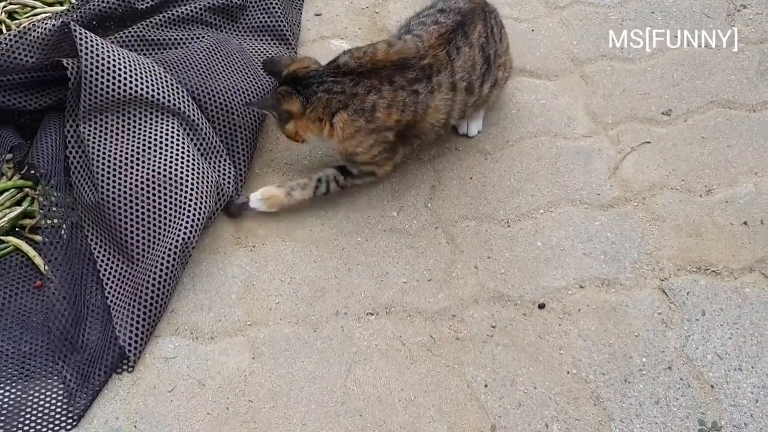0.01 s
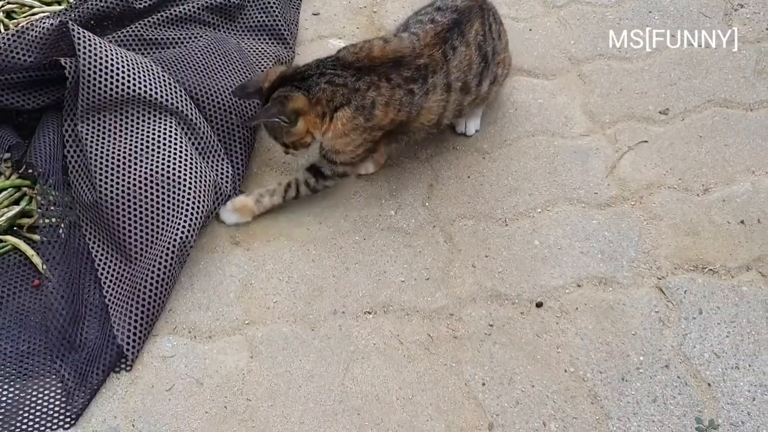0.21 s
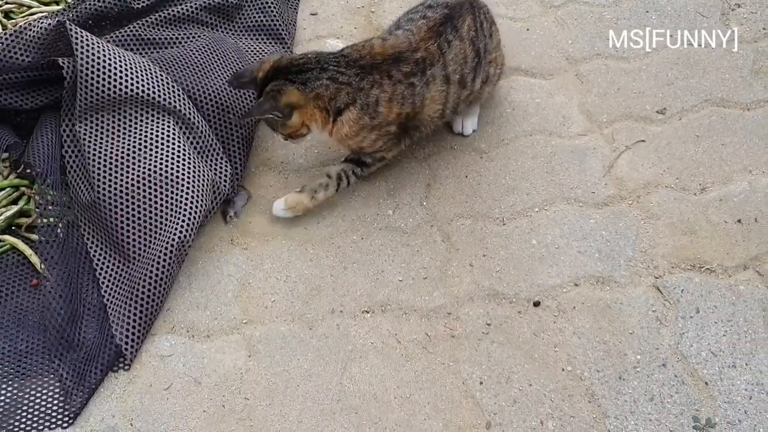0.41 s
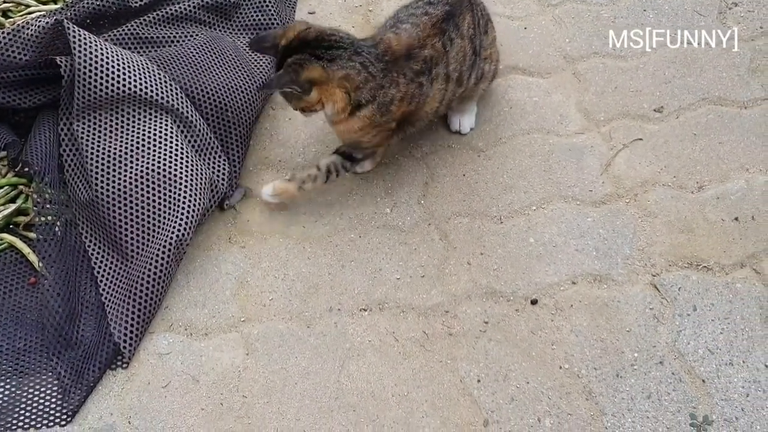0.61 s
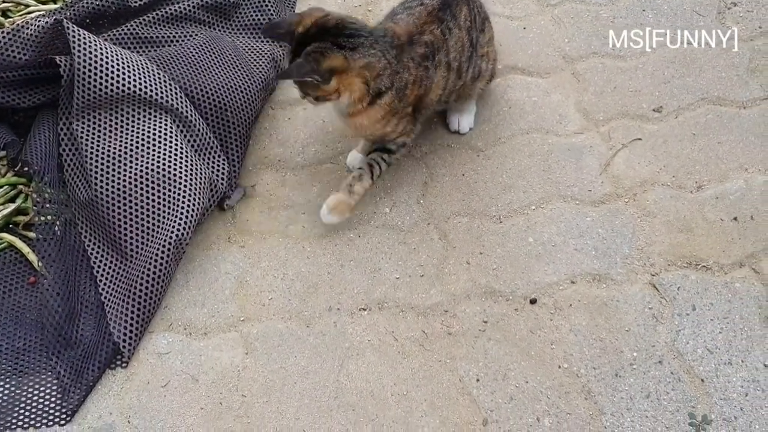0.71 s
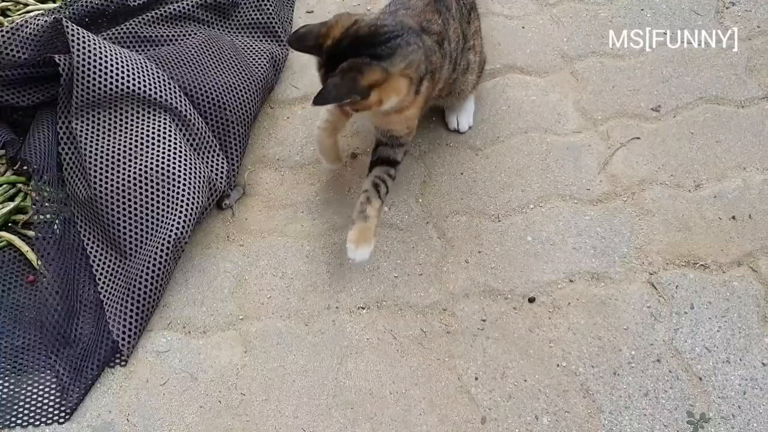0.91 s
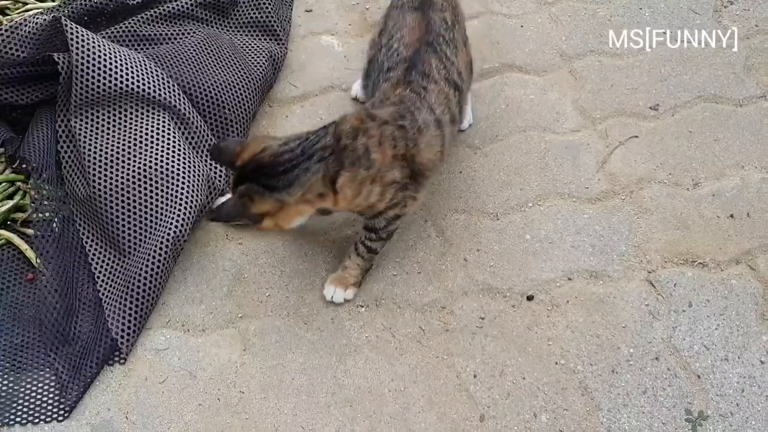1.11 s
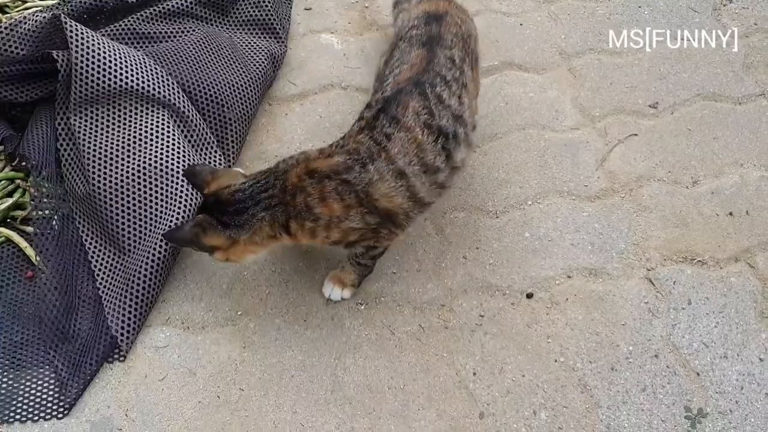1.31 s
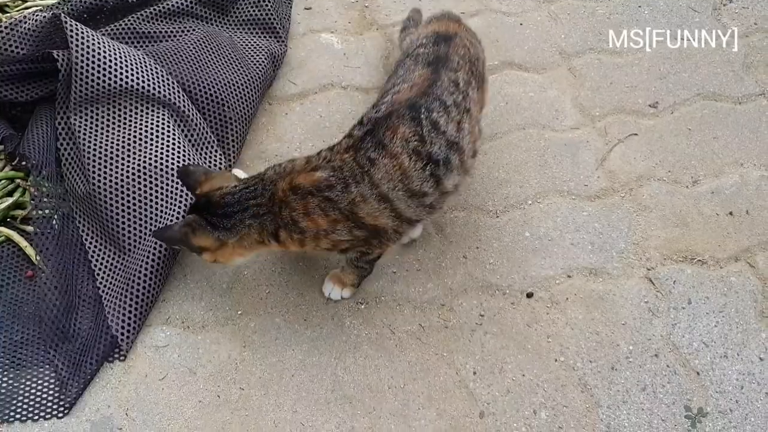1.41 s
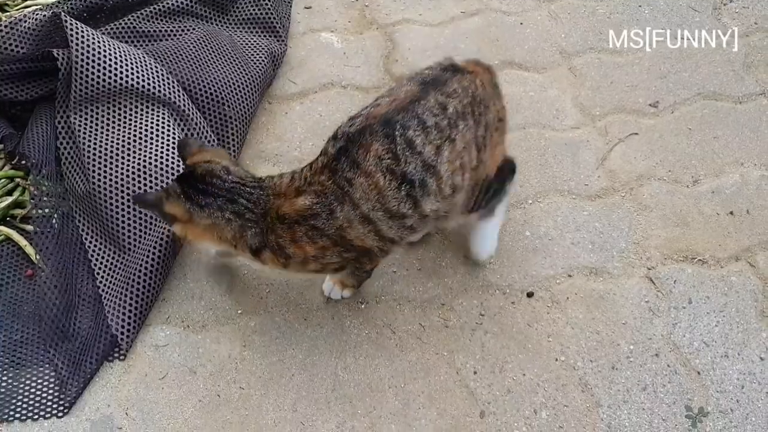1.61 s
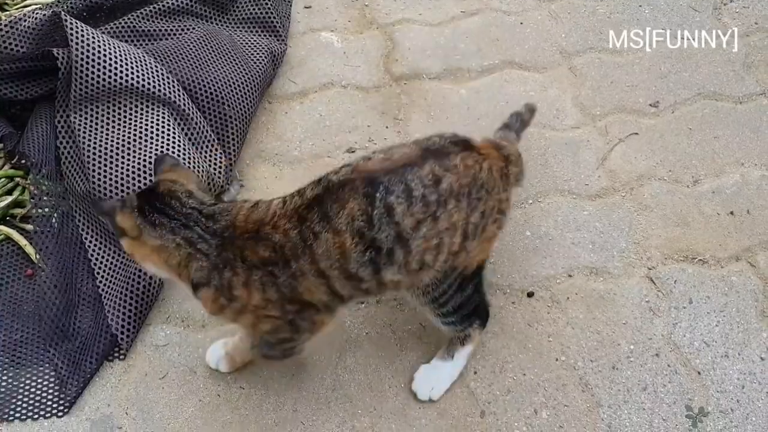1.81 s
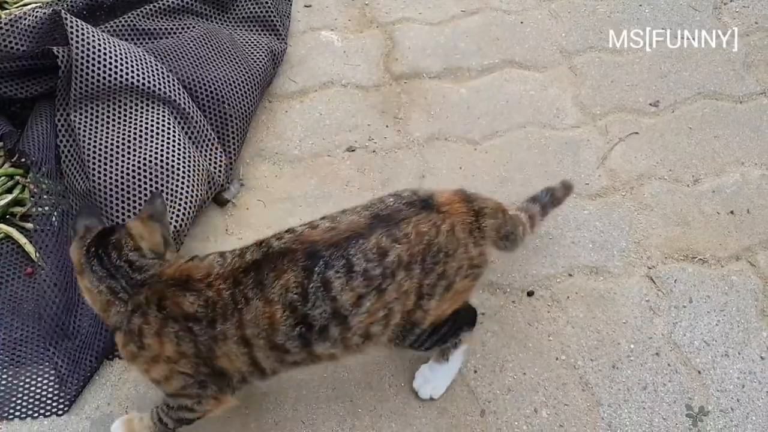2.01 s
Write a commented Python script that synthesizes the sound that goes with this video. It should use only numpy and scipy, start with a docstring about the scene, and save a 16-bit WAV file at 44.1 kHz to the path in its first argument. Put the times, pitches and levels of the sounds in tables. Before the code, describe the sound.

A mouse gives three shrill, trembling squeaks in an outdoor yard, the first overloading the close microphone. A cat's paws scuff netting and thud softly, with a faint low cat call before the last squeak. Far birds whistle and caw.

```python
"""First you hear a low outdoor rumble and a thin, far bird note. Then a mouse, hidden in netting on a paved
yard, gives three shrill, trembling squeaks as a cat paws at it. The first squeak is so loud that it overloads
the nearby microphone, which buzzes grittily. Paws scuff the net and pad on the ground, faint scratchy noises
sound under the later squeaks, and the cat gives one short low call. Far birds whistle and caw."""
import sys
import numpy as np
from scipy import signal
from scipy.fft import rfft, irfft, next_fast_len
from scipy.io import wavfile
from scipy.ndimage import map_coordinates

SR = 44100
rng = np.random.default_rng(int(sys.argv[2]) if len(sys.argv) > 2 else 0)


def store_wav(level_fs):
    """Save 16-bit WAV to argv[1]."""
    pcm = np.round(np.clip(np.atleast_2d(level_fs), -1, 1) * 32767)
    wavfile.write(sys.argv[1], SR, pcm.T.astype(np.int16))


N = 92610

# How alike the background and other broad noises are in both ears: frequency_hz, likeness (1 = same)
EAR_LIKENESS = [(60, 0.9), (150, 0.87), (350, 0.39), (700, .1), (3000, .05), (14000, 0.04)]
# Tone colour of the rumble: frequency_hz, gain_db
RUMBLE_COLOUR = [(13, -44.5), (22, -11.5), (36, -17), (60, 1), (78, -5), (108, -9.5), (167, -10.5),
                 (205, -5.5), (337, -22.5), (376, -25), (400, -26), (520, -31.5), (880, -120)]
# How the rumble rises and falls: time_s, level_db
RUMBLE_LEVEL = [(0.0, -46), (0.25, -42), (0.57, -42), (0.71, -49.5), (0.82, -45), (0.9, -46.5), (1.35, -46),
                (1.43, -40.5), (1.9, -43.5), (2.05, -41.5), (2.1, -46)]
# Tone colour of the steady outdoor hiss: frequency_hz, gain_db
AIR_COLOUR = [(180, -26), (300, 0), (395, -24), (436, -7.5), (556, -4), (698, -5.5), (965, -7.5),
              (1450, -10.5), (4360, -10.5), (14500, -13.5)]
# Thin notes of far birds: peak_s, spread_s, pitch_hz, width_hz, level_db, scoop_hz
BIRD_NOTES = [(0.046, 0.2, 3980, 600, -55, 0), (0.525, 0.1, 3860, 420, -51, 180),
              (.925, 0.07, 3520, 220, -55, 0), (1.895, 0.06, 4200, 450, -54.5, 0),
              (2.084, 0.048, 3950, 498, -58, 0)]
# Rasps in the mouse's voice: start_s, rise_s, level_db, fade_s (time to drop 60 dB)
RASPS = [(.178, 0.018, -29, 0.13), (.540, 0.017, -31.5, 0.3), (1.372, .012, -36, 0.42),
         (1.3995, 0.0015, -19, .05)]
# Tone colour of the rasps: frequency_hz, gain_db
RASP_COLOUR = [(7000, -28), (9500, -14), (11000, -2.5), (12500, 5), (14000, -0.5)]
# The path of each squeak: time_s, pitch_hz, level_db, pan_db (above 0 = to the left)
SHRIEK = [(0.18, 13130, -52, 0), (0.192, 12400, -46, 5), (0.196, 11400, -29, 10), (0.2, 12300, -35, 9),
          (0.202, 12080, -18, 11), (0.208, 12220, -18, 9), (0.211, 13310, -16, -1),
          (0.219, 13500, -13.5, -1), (0.23, 13000, -11.5, 1), (0.239, 12850, -7, 4),
          (0.245, 12930, -4.7, 7), (0.251, 12840, -4.8, 7.5), (0.257, 12660, -4.2, 4),
          (0.264, 12530, -7.5, 2), (0.271, 12600, -8.8, 2), (0.276, 13010, -7.7, -1), (0.279, 12970, -9, 0),
          (0.284, 13640, -11.7, -1), (0.291, 13100, -18, 3), (0.296, 12900, -32, -3), (0.3, 12380, -25, -1),
          (0.304, 12700, -42, -4)]
FALLING_SQUEAK = [(0.5405, 12770, -42, -1), (0.548, 12500, -46, 3), (0.551, 12400, -23, 2),
                  (0.556, 12900, -36, -1), (0.56, 13050, -27, -8), (0.5655, 12400, -28, 10),
                  (0.567, 14250, -20, 2), (0.577, 14200, -22, 1), (0.59, 13950, -21.5, 0),
                  (0.603, 13950, -21, 8), (0.616, 13300, -16.5, 7), (0.625, 13150, -19.5, 10),
                  (0.633, 13220, -21, 7), (0.637, 13250, -29, 7), (0.642, 13300, -30, 6),
                  (0.647, 13400, -46, -1)]
HOARSE_SQUEAK = [(1.3725, 11700, -34, 11), (1.375, 11600, -24, 11), (1.38, 12100, -28, 7),
                 (1.385, 12200, -26, 6), (1.389, 11400, -33, 3), (1.393, 11850, -24, 8),
                 (1.399, 11900, -34, 0), (1.402, 12700, -17, 5), (1.407, 12150, -19.5, 1),
                 (1.413, 12500, -21.5, 2), (1.42, 11900, -25, 8), (1.426, 11400, -34, 5),
                 (1.431, 11600, -40, 6), (1.434, 11550, -26, 15), (1.453, 11600, -24, 17),
                 (1.463, 11850, -24, 16), (1.467, 13100, -27, 8), (1.474, 12900, -24, 4),
                 (1.479, 12750, -26, 1), (1.483, 12700, -46, 0)]
# The three squeaks: path, tremble_depth_hz, tremble_depth_db, left_lead_rad, echo_db
SQUEAKS = [(SHRIEK, 35, .15, .55, -27), (FALLING_SQUEAK, 280, -1.3, 1.3, -15),
           (HOARSE_SQUEAK, 210, .9, 1.1, -13.5)]
# Paws scuffing the net: peak_s, spread_s, level_db
SCUFFS = [(0.254, 0.061, -43), (0.615, 0.057, -47.5), (1.456, 0.1, -52)]
# Tone colour of the scuffs: frequency_hz, gain_db
SCUFF_COLOUR = [(150, -7.5), (300, 5.5), (500, 7.5), (820, 3.5), (1200, -1), (2000, 4), (2800, 0.5),
                (4000, 4), (7000, -4), (10000, 5.5), (14000, -50)]
# Paws landing on the ground: start_s, level_db, pitch_hz
THUDS = [(0.201, -28.5, 123.5), (0.268, -32, 165), (0.403, -25.5, 73.3), (.548, -27.5, 140),
         (0.591, -31, 62), (0.79, -37, 72), (0.994, -35, 64.6), (1.463, -27, 68), (1.734, -36, 65),
         (2.022, -30, 64)]
# Brief gritty buzzes as the microphone overloads at the loudest squeak, a sharp claw tick just before them,
# then faint scratchy noise under later squeaks: peak_s, spread_s, pitch_hz, width_hz, level_db, pan_db
GRITS = [(0.251, 0.012, 820, 200, -44, 9), (0.247, 0.014, 1900, 800, -44, 10),
         (0.247, 0.012, 9350, 900, -41, 12), (0.25, 0.033, 5450, 900, -46, 6),
         (0.208, 0.002, 6500, 3500, -36, 5), (0.6, 0.04, 1000, 700, -56, 0),
         (0.6, 0.04, 2300, 600, -56, 1), (0.595, 0.045, 4450, 600, -54, 0),
         (0.615, 0.03, 6200, 900, -54, 0), (1.43, 0.08, 780, 600, -51.5, 0),
         (1.46, 0.045, 4100, 900, -52, 0), (1.44, 0.05, 7200, 1400, -58, 4)]
# The path of the cat's call: time_s, pitch_hz, level_db
CAT_CALL = [(.85, 339, -74.5), (.886, 384, -46), (.912, 396, -52), (.955, 333, -63)]
# Far crow-like caws: start_s, length_s, pitch_hz, level_db
CAWS = [(1.055, 0.15, 326.6, -52), (1.89, 0.164, 316.5, -50)]
# How the cawing bird's throat colours its voice: frequency_hz, gain_db
CAW_THROAT = [(600, -35), (980, -10), (1300, 1.5), (1600, 9), (1920, -4), (2400, -21), (3200, -40)]


def amp(db):
    """Turn decibels into a number to multiply by."""
    return 10 ** (np.asarray(db) / 20)


def unit(x):
    """Scale a signal to an average power of 1."""
    return x / np.sqrt(np.mean(np.abs(x) ** 2) + 1e-20)


def clock():
    """The time of each sample, in seconds."""
    return np.arange(N) / SR


def look_up(points, hz):
    """Read between the rows of a frequency table, with octaves evenly spaced."""
    frequencies, values = np.transpose(points)
    return np.interp(np.log(hz + 1), np.log(frequencies + 1), values)


def curves(rows):
    """Join timed rows with straight lines: one curve for each column after the time."""
    times, *columns = np.transpose(rows)
    return [np.interp(clock(), times, column) for column in columns]


def gate(rows, edge_s=.002):
    """On from the first row's time to the last, with soft edges."""
    inside_s = np.minimum(clock() - rows[0][0], rows[-1][0] - clock())
    return np.clip(inside_s / edge_s + 1, 0, 1)


def swell(peak_s, spread_s):
    """A bell-shaped rise and fall."""
    return np.exp(-((clock() - peak_s) / spread_s) ** 2)


def fade(age_s, fade_s):
    """Die away by 60 dB every fade_s seconds."""
    return np.exp(-np.log(1000) * age_s / fade_s)


def wobble(rate_hz):
    """A smooth curve through rate_hz random values a second."""
    return map_coordinates(rng.standard_normal(N // 4), [clock() * rate_hz], mode="wrap")


def phase(hz):
    """How far a wave has turned, in radians, as it follows a pitch curve."""
    return 2 * np.pi * np.cumsum(hz) / SR


def filtered(x, gain_at):
    """Turn each frequency up or down by gain_at(hz)."""
    size = next_fast_len(N + SR // 2)
    return irfft(rfft(x, size) * gain_at(np.fft.rfftfreq(size, 1 / SR)), size)[..., :N]


def panned(db):
    """Left and right gains that make the left louder by db, with the same total power."""
    gains = amp(np.array([db, -db]) / 2).reshape(2, -1)
    return gains / np.sqrt(np.mean(gains ** 2, axis=0))


def broad_noise(colour):
    """Stereo noise with a given tone colour; its bass is nearly the same in both ears."""
    def gain_at(hz):
        apart = np.arccos(np.clip(look_up(EAR_LIKENESS, hz), -1, 1)) / 2
        return amp(look_up(colour, hz)) * [np.cos(apart), np.sin(apart)]
    mid, side = filtered(rng.standard_normal((2, N)), gain_at)
    return unit(np.array([mid + side, mid - side]))


def narrow_noise(hz, width_hz):
    """Stereo noise close around a steady or moving pitch."""
    tone = np.exp(1j * phase(hz + np.zeros(N)))
    ears = [(tone * (wobble(width_hz) + 1j * wobble(width_hz))).real for ear in range(2)]
    return unit(np.array(ears))


def echo(x, fade_s, delay_s):
    """Sound bouncing off paving and walls: a blurred tail, different in each ear."""
    t = clock()[:SR // 2]
    tail = rng.standard_normal((2, len(t))) * fade(t, fade_s) * (t > delay_s)
    tail /= np.linalg.norm(tail, axis=1, keepdims=True)
    return signal.fftconvolve(x[None], tail, axes=1)[:, :N]


def yard(boost_db=1.5, lumps_db=1.8, air_db=-49):
    """A low, uneven outdoor rumble under a smooth hiss."""
    level_db, = curves(RUMBLE_LEVEL)
    rumble = amp(level_db + boost_db + lumps_db * wobble(12.94)) * broad_noise(RUMBLE_COLOUR)
    air = amp(air_db) * broad_noise(AIR_COLOUR)
    return panned(db=1) * (rumble + air)


def bird_notes():
    """Far whistles smeared into narrow noise; one scoops down in pitch and up again."""
    out = np.zeros((2, N))
    for peak_s, spread_s, hz, width_hz, db, scoop_hz in BIRD_NOTES:
        from_peak = np.minimum(np.abs(clock() - peak_s) / spread_s, 1)
        out += amp(db) * swell(peak_s, spread_s) * narrow_noise(hz + scoop_hz * from_peak, width_hz)
    return out


def mouse_rasps(sputter_db=4):
    """A sputtering hiss where a squeak starts or cracks."""
    level = np.zeros(N)
    for start_s, rise_s, db, fade_s in RASPS:
        age_s = clock() - start_s
        rise = np.clip(age_s / rise_s, 0, 1)
        level += amp(db) * rise * fade(np.maximum(age_s - rise_s, 0), fade_s)
    sputter = unit(broad_noise(RASP_COLOUR) * amp(sputter_db * wobble(500)))
    return level * panned(db=4) * sputter


def mouse_squeak(path, tremble_depth_hz, tremble_depth_db, left_lead_rad, echo_db):
    """A high, trembling whistle that breaks up at its start and echoes around the yard."""
    tremble_rate_hz, break_db, break_s = 118, 3, .025
    pitch_hz, level_db, pan_db = curves(path)
    tremble = np.sin(phase(tremble_rate_hz * (1 + .06 * wobble(40))))
    tremble *= 1 + .3 * wobble(tremble_rate_hz)  # some shakes are bigger than others
    jitter_hz = 14 * amp(-.8 * level_db) * wobble(700)  # the softer the voice, the less steady its pitch
    flicker_db = break_db * swell(path[0][0], break_s) * np.tanh(wobble(380))
    tone = np.exp(1j * phase(pitch_hz + tremble_depth_hz * tremble + jitter_hz))
    voice = np.sqrt(2) * gate(path) * tone * amp(level_db + tremble_depth_db * tremble + flicker_db)
    lead = np.exp(.5j * left_lead_rad * np.array([[1], [-1]]))  # the wave is ahead at the left microphone
    direct = (voice * panned(pan_db) * lead).real
    return direct + amp(echo_db) * echo(voice.real, fade_s=.105, delay_s=.003)


def paw_scuffs(grain_db=1.8):
    """Paws rub the net, making swells of grainy noise."""
    level = sum(amp(db) * swell(peak_s, spread_s) for peak_s, spread_s, db in SCUFFS)
    return level * unit(broad_noise(SCUFF_COLOUR) * amp(grain_db * wobble(250)))


def paw_thuds(rise_s=.0068):
    """Soft paws land on the ground: each is a low tone that quickly dies away."""
    out = np.zeros(N)
    for start_s, db, hz in THUDS:
        age_s = np.maximum(clock() - start_s, 0)
        rise = 1 - np.exp(-age_s / rise_s)
        out += amp(db) * np.sin(2 * np.pi * hz * age_s) * rise * fade(age_s, fade_s=.14)
    return out


def gritty_noises(grain_db=3):
    """Brief gritty buzzes as the microphone overloads at the loudest squeak, a sharp claw tick just before
    them, then faint scratchy noise under later squeaks: each rings around one pitch, in uneven grains."""
    grain = unit(amp(grain_db * wobble(260)))
    creaks = sum(amp(db) * swell(peak_s, spread_s) * panned(pan_db) * narrow_noise(hz, width_hz)
                 for peak_s, spread_s, hz, width_hz, db, pan_db in GRITS)
    return grain * creaks


def cat_call(overtone_db=-21):
    """The cat calls with its mouth closed: nearly a pure tone, rising and then falling."""
    pitch_hz, level_db = curves(CAT_CALL)
    angle = phase(pitch_hz * (1 + .021 * wobble(79.7)))
    voice = np.sin(angle) + amp(overtone_db) * np.sin(2 * angle)
    return np.sqrt(2) * gate(CAT_CALL) * amp(level_db) * voice


def caws(arch=.06, sag_per_s=.18, jitter=.024, echo_db=-1):
    """Crow-like calls with an arching pitch: overtones shaped by the throat and blurred by distance."""
    out = np.zeros(N)
    for start_s, length_s, hz, db in CAWS:
        place = np.clip(2 * (clock() - start_s) / length_s - 1, -1, 1)  # -1 at the start, 1 at the end
        sag = sag_per_s * place * length_s / 2
        angle = phase(hz * (1 - arch * place ** 2 - sag + jitter * wobble(150)))
        overtones = sum(amp(look_up(CAW_THROAT, k * hz)) * np.sin(k * angle) for k in range(2, 10))
        level = amp(db + .31 * wobble(40)) * np.sqrt(1 - place ** 2)
        out += level * unit(overtones)
    return out + amp(echo_db) * echo(out, fade_s=.38, delay_s=.01)


def scene():
    """Add up the mouse, the cat, the far birds and the yard, in stereo."""
    mouse = mouse_rasps() + sum(mouse_squeak(*row) for row in SQUEAKS)
    struggle = paw_scuffs() + paw_thuds() + gritty_noises()
    return mouse + struggle + cat_call() + caws() + bird_notes() + yard()


def record(dry, ceiling=.92, hardness=14, top_hz=14650):
    """The overloaded microphone flattens the loudest peaks; then the highest treble is cut off."""
    # Flattening adds overtones too high for the sample rate, which fold down into a faint chirp.
    clipped = dry / (1 + np.abs(dry / ceiling) ** hardness) ** (1 / hardness)
    return filtered(clipped, lambda hz: np.clip((top_hz - hz) / 200 + .5, 0, 1))


dry = scene()
out = record(dry)
store_wav(out)
```